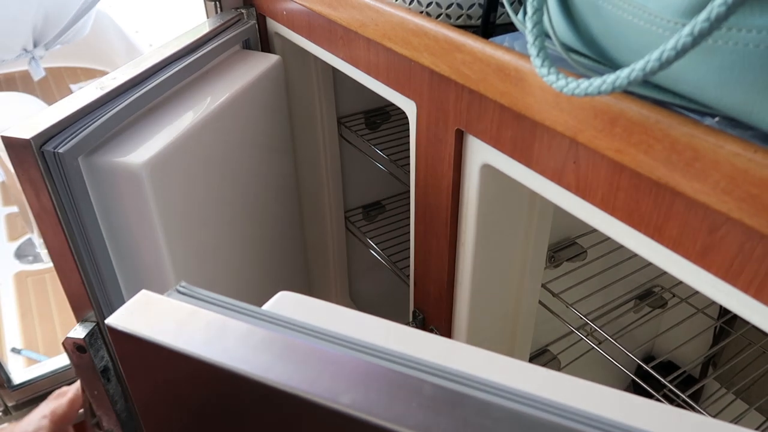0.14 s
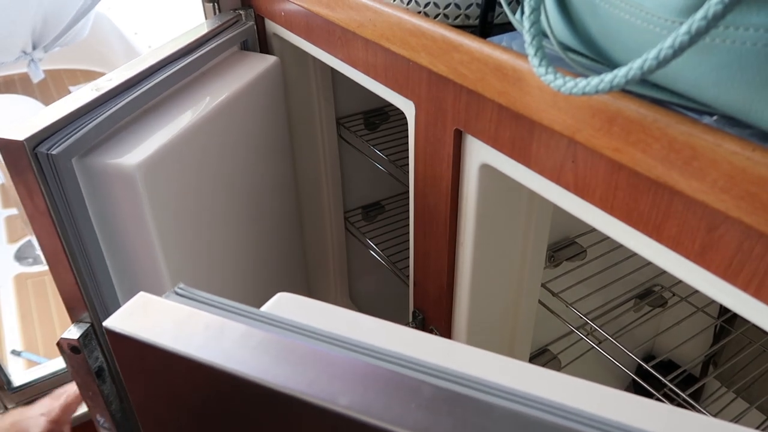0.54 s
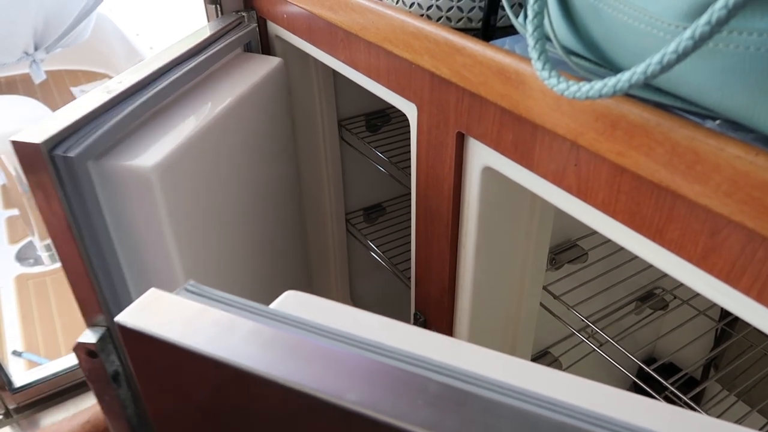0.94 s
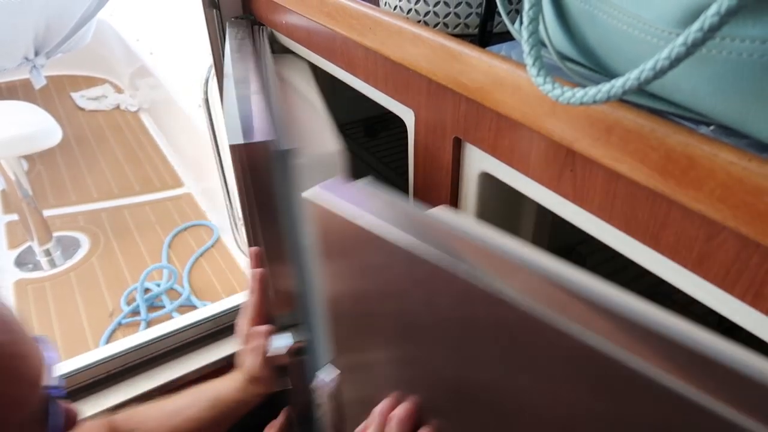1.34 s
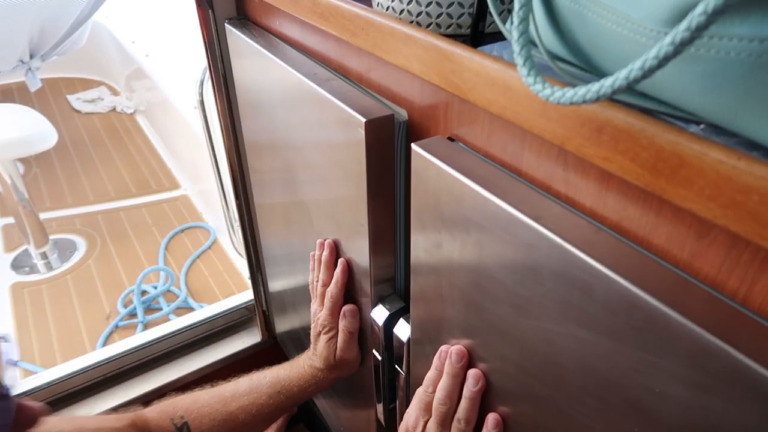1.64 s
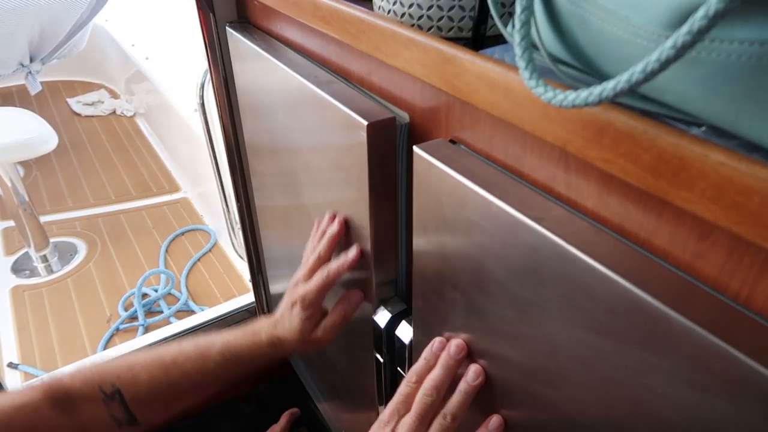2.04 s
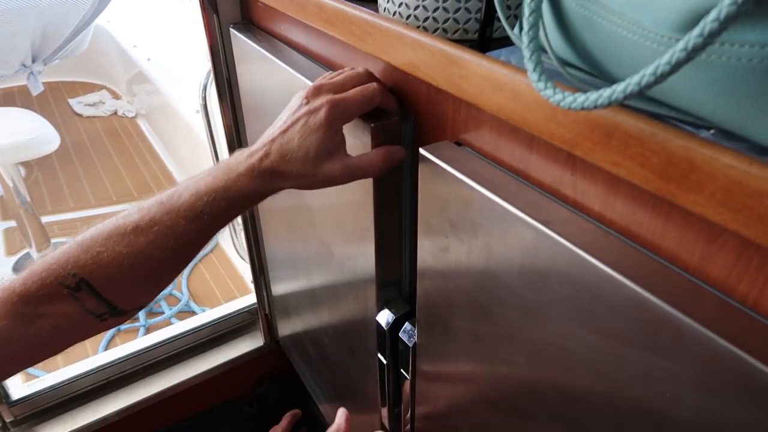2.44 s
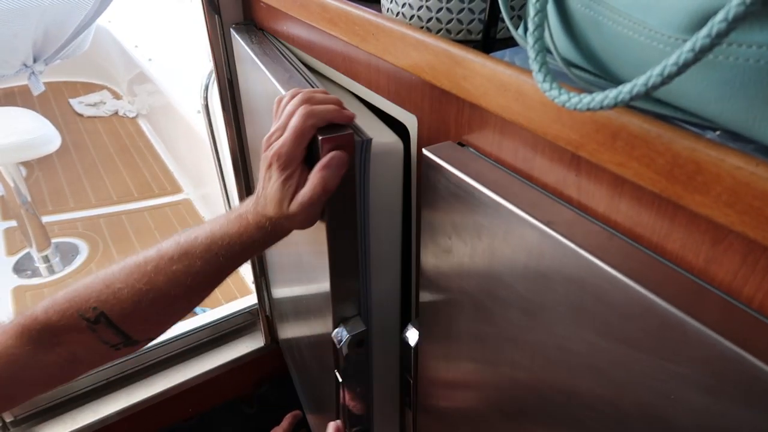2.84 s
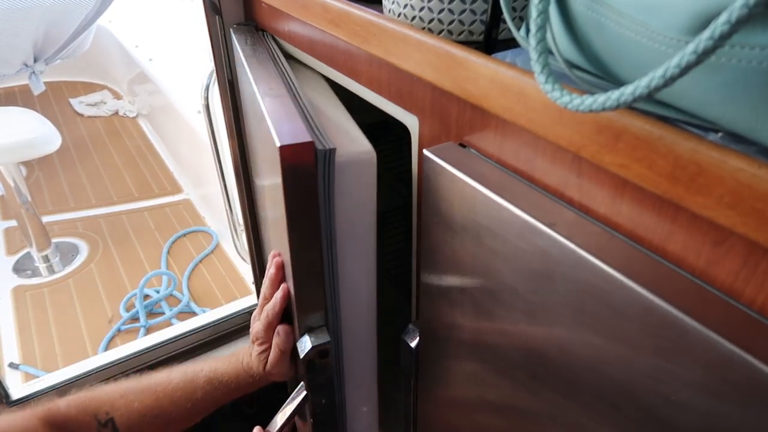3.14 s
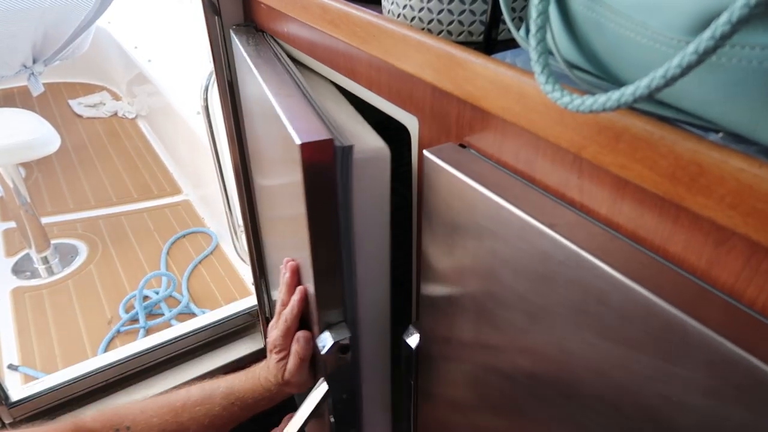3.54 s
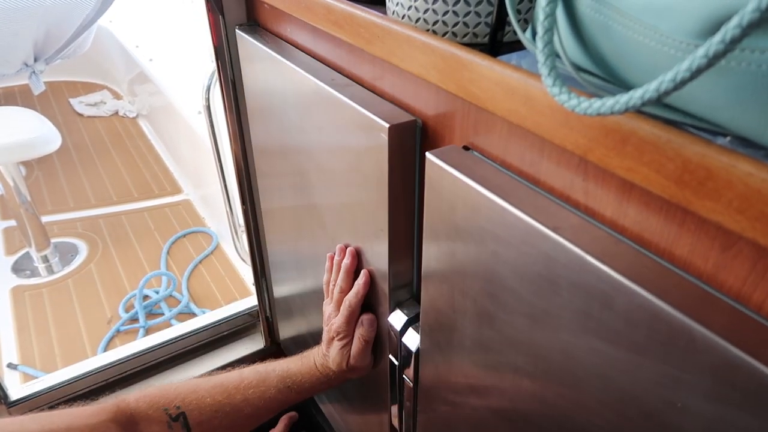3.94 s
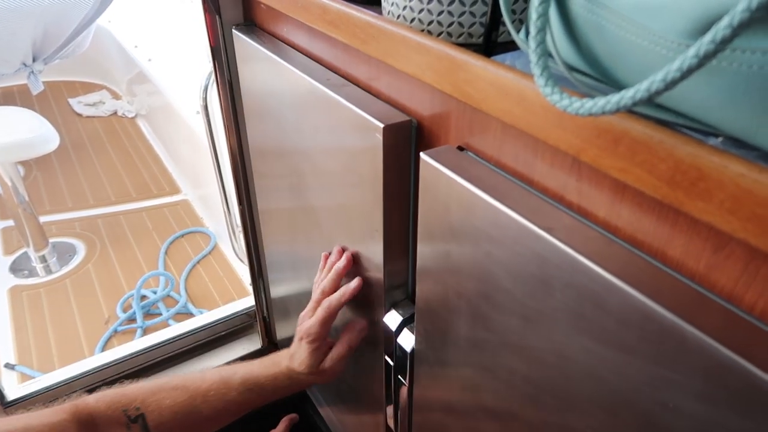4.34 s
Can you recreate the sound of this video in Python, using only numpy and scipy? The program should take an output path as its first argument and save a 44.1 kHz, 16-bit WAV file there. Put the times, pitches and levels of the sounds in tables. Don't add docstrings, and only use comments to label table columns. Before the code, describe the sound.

Two metallic latch snaps, then heavy steel cold-box doors slam, one is pulled open, bumps and slams again in a small boat cabin.

```python
import sys
import numpy as np
from scipy import signal
from scipy.fft import rfft, irfft, next_fast_len
from scipy.io import wavfile
from scipy.ndimage import uniform_filter1d, map_coordinates

SR = 44100
rng = np.random.default_rng(int(sys.argv[2]) if len(sys.argv) > 2 else 0)


def dump(signal):
    limited = np.clip(np.atleast_2d(signal).T, -1, 1)
    pcm = np.round(limited * 32767).astype(np.int16)
    wavfile.write(sys.argv[1], SR, pcm)


def invert_db(level):
    return 10 ** (np.asarray(level, dtype=float) / 20)


N = 197523

# f/Hz, side minus mid level/dB
PORT_DIFFERENCE = [(60, -62.5), (110, -59.5), (200, -36.5), (380, -26), (700, -22.5), (1290, -16.5),
                   (2380, -10), (4400, -7), (8120, -3), (15000, 6)]
# f/Hz, time to fall 60 dB/s
ECHO_TIME = [(100, 0.4), (400, 0.23), (2000, 0.2), (8000, .18), (14000, 0.076)]
# t/s, half length/s, air lift/dB, wash lift/dB
WAVES = [(.27, 0.13, 1.5, 2.5), (1.446, 0.15, 0.6, 1), (2.982, 0.063, 0.3, 1.5), (3.553, 0.056, 1.4, 2),
         (3.719, 0.14, 2.5, 0.5)]


def unit(x):
    return x / np.sqrt(np.mean(x ** 2) + 1e-20)


def along(points, hz):
    f, value = np.transpose(points)
    return np.interp(np.log(hz + 1), np.log(f + 1), value)


def filtered(x, response):
    size = next_fast_len(x.shape[-1] + 8192)
    spectrum = rfft(x, size) * response(np.fft.rfftfreq(size, 1 / SR))
    return irfft(spectrum, size)[..., :x.shape[-1]]


def resonance(hz, centre_hz, width_hz):
    return 1 / (1 + ((hz - centre_hz) / width_hz) ** 2)


def wobble(rate):
    knots = rng.standard_normal(int(N * rate / SR) + 4)
    return map_coordinates(knots, [np.arange(N) * rate / SR])


def swell(s, half):
    return np.exp(-((np.arange(N) / SR - s) / half) ** 2)


def dying(t, t60, attack=0.00011):
    fall = invert_db(-60 * np.abs(t) / max(t60, .002))
    return (t >= 0) * fall * (1 - np.exp(-np.abs(t) / attack))


def noise(spectrum):
    return unit(filtered(rng.standard_normal(N), lambda hz: invert_db(along(spectrum, hz))))


def port_balance(hz):
    return np.array([np.ones_like(hz), invert_db(along(PORT_DIFFERENCE, hz))])


def pair(count, gain):
    both = filtered(rng.standard_normal((2, count)), lambda hz: gain(hz) * port_balance(hz))
    return both / np.std(both[0])


def gain_db():
    # t/s, drop/dB, hold/s before it creeps back
    drops = [
        (0, 0, 0.3),
        (0.362, 4.5, .25),
        (0.695, 9, .3),
        (1.58, 14, 0.41),
        (2.633, 1.5, .05),
        (3.101, 1, .05),
        (3.89, 15.5, 0.28),
    ]
    creep_db_per_s, fall_s = 10, 0.11
    t = np.arange(N) / SR
    fallen = sum(db * np.clip((t - s) / fall_s + .5, 0, 1) for s, db, hold in drops)
    held = np.any([(t >= s) & (t < s + hold) for s, db, hold in drops], axis=0)
    return creep_db_per_s * np.cumsum(~held) / SR - fallen


def sensor_hiss():
    # f/Hz, level/dB
    mid_colour = [(2060, -31), (3500, -7.5), (4120, -12.5), (4690, -1.5), (5340, -3.5), (6710, -3),
                  (7280, -6.5), (11200, -6), (12800, -9.5), (16600, -45), (22000, -120)]
    # f/Hz, level/dB
    side_colour = [(1760, -28), (3000, -3), (3190, -4), (3840, -6), (4560, -3), (11800, -2.5),
                   (15500, -10.5)]
    # from t/s, to t/s, added level/dB
    openings = [
        (0, 1.5, 3.5),
        (2.62, 3.85, 3),
        (3.15, 3.55, 3),
    ]
    level_db, follows_gain = -63.5, 0.82
    t = np.arange(N)
    fan_db = sum(db * ((t >= a * SR) & (t < b * SR)) for a, b, db in openings)
    hiss_db = level_db + follows_gain * gain_db() + uniform_filter1d(fan_db, size=SR // 10)
    mid = noise(mid_colour + [(13300, -120)])
    side = invert_db(4.5) * noise(side_colour)
    return invert_db(hiss_db) * np.array([mid, side])


def harbour_air():
    # f/Hz, level/dB
    colour = [(260, -30.5), (450, -2), (586, -4), (688, -2), (856, -6.5), (1180, -5), (1370, -10),
              (1520, -9.5), (3560, -22.5), (7000, -31.5), (9100, -58), (15400, -120)]
    # f/Hz, width/Hz, level/dB against the air
    whistles = [(700, 28, -12), (3115, 24, -23), (4500, 70, -25), (6540, 15, -27.5)]
    air_db = -40.5 + gain_db() + sum(db * swell(s, half) for s, half, db, _ in WAVES)
    air = invert_db(0.89 * wobble(11)) * pair(N, lambda hz: invert_db(along(colour, hz)))
    for centre_hz, width_hz, db in whistles:
        whistle_db = db + 1.7 * wobble(3.2) + np.array([[0], [3]])
        air += invert_db(whistle_db) * pair(N, lambda hz: resonance(hz, centre_hz, width_hz))
    return invert_db(air_db) * air


def hull_wash():
    # f/Hz, level/dB
    colour = [(60, -40.5), (90, -2.5), (135, -1), (210, 0), (290, -1.5), (380, -3.5), (480, -13.5),
              (700, -60)]
    wash_db = -37.5 + gain_db() + sum(db * swell(s, half) for s, half, _, db in WAVES)
    wash = invert_db(1.3 * wobble(12)) * pair(N, lambda hz: invert_db(along(colour, hz)))
    return invert_db(wash_db) * wash


def motors():
    motor_hz = [51.95, 53.52, 58.18]
    # level/dB, t/s when first in step with the lowest
    strengths = [(-1.15, 0), (-4.5, 0.1), (0.1, .0275)]
    # f/Hz, level/dB
    rumble = [(15, -30), (25, -16), (38, -6), (50, 1), (70, -2.5), (90, -20), (130, -60.5)]
    # f/Hz, width/Hz, level/dB
    drones = [(285, 9.4, -53), (1143, 25, -58)]
    # t/s, half length/s, lift/dB
    rocks = [(0.121, 0.3, 9.5), (0.622, 0.048, 6.5), (0.832, 0.085, 7), (2.8, .12, 3.5), (4.05, 0.057, 3.5)]
    hum_db, rumble_db, side_db, follows_gain = -41.5, -46.5, -37, .9
    t = np.arange(N) / SR
    low = motor_hz[0]
    tones = np.zeros(N)
    for hz, (db, s) in zip(motor_hz, strengths):
        tones += invert_db(db) * np.sin(2 * np.pi * (low * t + (hz - low) * (t - s)))
    gain = gain_db()
    rocking_db = follows_gain * gain + sum(db * swell(s, half) for s, half, db in rocks)
    hum = invert_db(rocking_db) * (invert_db(hum_db) * tones + invert_db(rumble_db) * noise(rumble))
    drone = sum(invert_db(db) * pair(N, lambda hz: resonance(hz, centre, width)) for centre, width, db in drones)
    return np.array([hum, invert_db(side_db) * np.roll(hum, SR // 200)]) + invert_db(gain) * drone


def seals():
    # t/s, half length/s, level/dB
    swishes = [(1.106, 0.22, -75), (2.17, 0.1305, -78), (3.053, .03, -71), (3.189, 0.1, -62),
               (4.469, .08, -81)]
    # f/Hz, level/dB
    colour = [(7000, -33.5), (9500, -11.5), (11200, 1.5), (13000, -10), (14500, -33)]
    puffs = invert_db(1.5 * wobble(6.9)) * sum(invert_db(db) * swell(s, half) for s, half, db in swishes)
    return puffs * np.array([noise(colour), invert_db(-17) * noise(colour)])


def echo(x):
    hz, t, z = signal.stft(rng.standard_normal((2, SR // 2)), SR, nperseg=256)
    fade = invert_db(-60 * t / along(ECHO_TIME, hz)[:, None])
    tail = signal.istft(z * fade, SR, nperseg=256)[1]
    wet = signal.fftconvolve(x[None], tail / np.linalg.norm(tail[0]), axes=1)[:, :len(x)]
    return filtered(wet, port_balance)


def diffuse(t, colour):
    hz, frames, z = signal.stft(pair(len(t), lambda hz: invert_db(along(colour, hz))), SR, nperseg=256)
    fade = invert_db(-60 * np.maximum(frames + t[0], 0) / along(ECHO_TIME, hz)[:, None])
    scattered = signal.istft(z * fade, SR, nperseg=256)[1][:, :len(t)]
    return scattered * dying(t, 99, 0.0052)


def panel_ring(t, rings):
    ring = np.zeros(len(t))
    for s, hz, db, t60 in rings:
        ring += invert_db(db) * dying(t - s, t60, 0.39 / hz) * np.sin(2 * np.pi * hz * (t - s))
    return ring


def clatter(t, rattles, colour, loudest, scrape_db, rise):
    hardest_db = max(db for s, db, t60 in rattles)
    dullness = lambda db: invert_db(0.32 * (db - hardest_db))
    rattle = pair(len(t), lambda hz: invert_db(along(colour, hz)))
    rattle = rattle * invert_db(0.95 * wobble(449.5)[:len(t)])
    bright = filtered(rattle, lambda hz: 1 / (1 + (3000 / (hz + 1)) ** 2))
    force = invert_db(scrape_db) * dying(loudest - t, rise * 3)
    edge = force * dullness(scrape_db)
    for s, db, t60 in rattles:
        force = np.hypot(force, invert_db(db) * dying(t - s, t60))
        edge = np.hypot(edge, invert_db(db) * dullness(db) * dying(t - s, t60 * 1.1))
    return force * (rattle - bright) + edge * bright


def latch_bolt(t):
    bolt_hz = [4400, 6250, 8200, 10200, 12180]
    # width/Hz, level/dB
    peaks = [(463, -13.5), (400, -6), (600.7, -15), (300, -3), (250, -10)]
    spectrum = lambda hz: sum(invert_db(db) * resonance(hz, c, w) for c, (w, db) in zip(bolt_hz, peaks))
    return invert_db(np.array([[-7], [0]])) * dying(t, 0.22) * pair(len(t), spectrum)


def carcass_boom(t):
    # f/Hz, level/dB
    colour = [(60, -29), (95, 2), (130, -5), (215, -1), (300, -28.5), (600, -72.5)]
    return dying(t, 0.29, .015) * noise(colour)[:len(t)]


def blow(rings, rattles, colour, scrape_db, rise, steel_db, echo_db, panel_db, boom_db):
    loudest = max(rings, key=lambda contact: contact[2])[0]
    hardest_db = max(contact[1] for contact in rattles)
    start = round((rings[0][0] - .1) * SR)
    t = (start + np.arange(SR // 2)) / SR
    ring = panel_ring(t, rings)
    direct = clatter(t, rattles, colour, loudest, scrape_db, rise)
    direct += invert_db(steel_db) * latch_bolt(t - loudest)
    direct[0] += ring + invert_db(boom_db) * carcass_boom(t - loudest)
    direct[1] += filtered(ring, lambda hz: 1j * invert_db(along(PORT_DIFFERENCE, hz) - 5.5))
    wet = invert_db(panel_db) * echo(ring) + invert_db(hardest_db) * diffuse(t - loudest, colour)
    return start, direct + invert_db(echo_db + np.array([[0], [2.5]])) * wet


def doors():
    # (t/s, level/dB, t60/s)
    latch_a = ([(.3345, 300, -14.5, .053), (.3338, 1570, -5.5, .022), (.3342, 2112, -7, 0.038),
                (.345, 1900, -17, .07), (.3372, 2114, -19, .11), (.338, 1350, -12.5, 0.054),
                (.339, 4450, -20, .02), (.336, 620, -15, .04)], [(.3338, -11.5, 0.087), (.3372, -15, 0.053),
                (.3395, -16, 0.07)])
    latch_b = ([(.6606, 307, -13, 0.032), (.6612, 746.5, -4.5, 0.01), (.6666, 3465, -4, .022),
                (.683, 3360, -17.5, .03), (.6615, 4396, -13.5, .02), (.7, 115.3, -36, .4)],
                [(.6612, -4, .048), (.683, -22.5, .13)])
    slam_a = ([(1.528, 908, -28.5, .02), (1.534, 700, -22, .03), (1.5395, 694.6, 0.9, .03),
               (1.5416, 311, -8, .07), (1.548, 429.5, -7, 0.043), (1.549, 2135, -13, .03),
               (1.546, 65.75, -6.5, .13), (1.5462, 680, -2.5, 0.026), (1.5515, 616.4, -15, .1),
               (1.552, 219.3, -18, .12), (1.555, 110, -23, 0.18), (1.562, 607, -26.5, .12),
               (1.583, 64.9, -22, .13)], [(1.528, -24.5, .02), (1.534, -23, .04), (1.5395, -10, .08),
               (1.5452, -5, .035), (1.5485, -5, 0.037), (1.552, -16, .06), (1.583, -29, .1)])
    pull = ([(2.5935, 3260, -18, 0.022), (2.594, 5080, -20, 0.043), (2.5945, 6520, -21, 0.037),
             (2.5975, 1363, -7.5, 0.018), (2.599, 886, -14.5, 0.025), (2.6022, 3440, -22, 0.018),
             (2.603, 423, -21.5, 0.12), (2.596, 111, -30, 0.11)], [(2.5935, -16.5, 0.029),
             (2.5975, -14.5, 0.034), (2.602, -19, .057)])
    bump_back = ([(3.0773, 2150, -16.5, .024), (3.078, 1057, -5.5, 0.0164), (3.0814, 5420, -21, 0.023),
                  (3.079, 400, -19, 0.05), (3.0845, 435, -18, 0.038), (3.0852, 1150, -13, 0.016),
                  (3.096, 776, -20, 0.061), (3.1, 419, -19.5, 0.064), (3.1, 2150, -26, 0.045)],
                  [(3.0773, -21, .023), (3.0781, -18.5, .04), (3.0814, -22, .054), (3.0852, -20.5, .033),
                  (3.096, -28, 0.054)])
    slam_b = ([(3.834, 1100, -24, .04), (3.847, 1052, -1.17, .017), (3.8525, 622.4, -7, .027),
               (3.8525, 291.3, -1.5, .045), (3.853, 130.8, -2.5, .035), (3.854, 207, -7.5, 0.07),
               (3.8535, 1054, -6.5, 0.022), (3.8605, 1528, -10, .02), (3.8619, 2090, -12.5, 0.014),
               (3.8605, 410, -6, .05), (3.8545, 560, -8, .02), (3.87, 59.6, -25, .14)],
               [(3.834, -33.5, 0.074), (3.847, -9, .03), (3.8535, -10, 0.047), (3.861, -2, .03),
               (3.864, -17.5, 0.081)])
    # f/Hz, level/dB
    latch_a_colour = [(150, -21.5), (250, -1.5), (525, -6.5), (768, -4), (995, -7.5), (2050, -4.5),
                      (2570, -9), (3000, -8.5), (5130, -16.5), (5590, -14.5), (11800, -23), (15500, -43.5)]
    latch_b_colour = [(150, -31), (250, -1.5), (516, -10), (768, -3), (1030, -8), (1510, -2.5),
                      (1790, -11.5), (3450, -9.5), (4870, -16.5), (6310, -18.5), (12000, -17), (15500, -33)]
    slam_a_colour = [(150, -14.5), (250, -10), (544, -14), (624, -9.5), (1200, -9.5), (1480, -13.5),
                     (2900, -16.5), (3160, -16), (3760, -18), (5400, -27), (11400, -34), (15500, -47.5)]
    pull_colour = [(150, -43), (250, -4), (434, -8), (681, -10.5), (867, -4), (1180, -5.5), (1450, -6.5),
                   (1920, -7.5), (3570, -9), (4100, -15.5), (11500, -11.5), (15500, -24.5)]
    bump_colour = [(150, -31), (250, -5.5), (427, -9), (563, -33), (768, -4.5), (1730, -18.5), (2200, -9),
                   (2440, -12), (2620, -16), (6310, -27), (11800, -25), (15500, -40)]
    slam_b_colour = [(150, -30), (250, -9), (398, -4), (525, -9), (1140, -5.5), (1250, -22.5), (1510, -5),
                     (1920, -10.5), (4550, -11.5), (5890, -18), (12500, -22), (15500, -29)]
    # level/dB, rise/s
    scrapes = [
        (-25, 0.0034),
        (-20, 0.018),
        (-20.5, 0.018),
        (-22, 0.007),
        (-40.5, 0.012),
        (-28.5, 0.012),
    ]
    # steel ring/dB, cabin echo/dB, panel ring's share of echo/dB, carcass boom/dB
    balances = [
        (-28, -6, -11.5, -34.5),
        (-21.5, -18, -6.5, -26.5),
        (-33, -10.5, -3.5, -28.5),
        (-28.5, -9, 0.4, -41.5),
        (-41, -3, -9.5, -26.5),
        (-24, -13.5, -14.5, -29),
    ]
    contacts = [latch_a, latch_b, slam_a, pull, bump_back, slam_b]
    colours = [latch_a_colour, latch_b_colour, slam_a_colour, pull_colour, bump_colour, slam_b_colour]
    out = np.zeros((2, N + SR))
    for (rings, rattles), colour, scrape, balance in zip(contacts, colours, scrapes, balances):
        start, sound = blow(rings, rattles, colour, *scrape, *balance)
        out[:, start:start + sound.shape[1]] += sound
    return out[:, :N]


def scene():
    mid, side = sensor_hiss() + harbour_air() + hull_wash() + motors() + seals() + doors()
    return np.array([mid + side, mid - side])


def top_cut(x):
    return signal.sosfilt(signal.butter(12, 15640, fs=SR, output="sos"), x)


def record(dry):
    clipped = dry / (1 + np.abs(dry / .98) ** 8) ** (1 / 8)
    low_cut = lambda hz: 1j * hz / (28 + 1j * hz)
    treble_limit = lambda hz: np.where(hz < 15650, 1, .05)
    mix = filtered(clipped, lambda hz: low_cut(hz) * treble_limit(hz))
    return top_cut(mix)


dry = scene()
out = record(dry)
dump(out)
```